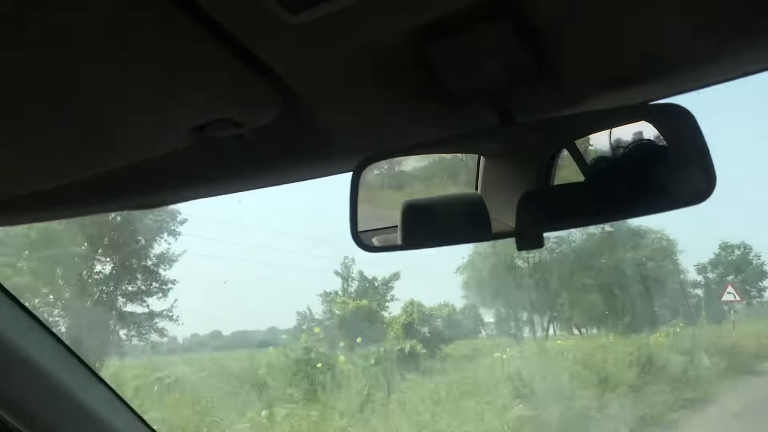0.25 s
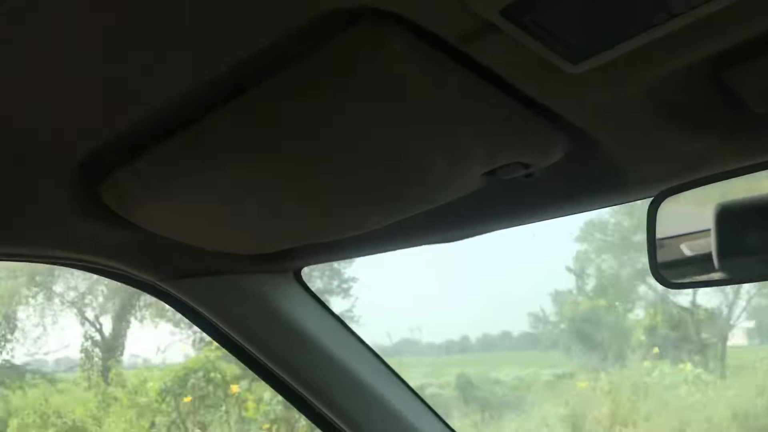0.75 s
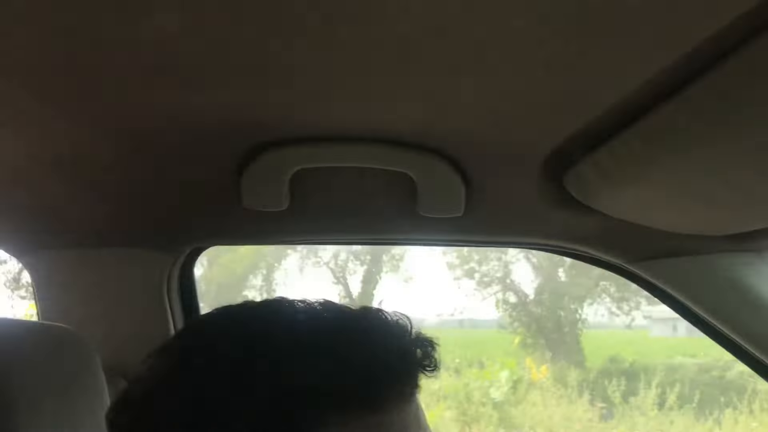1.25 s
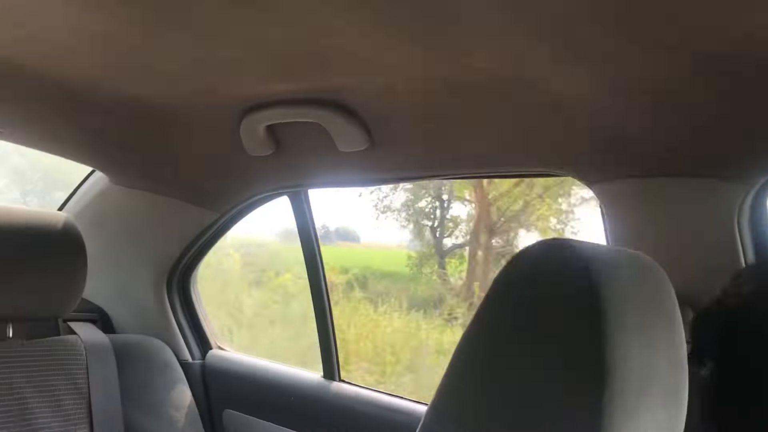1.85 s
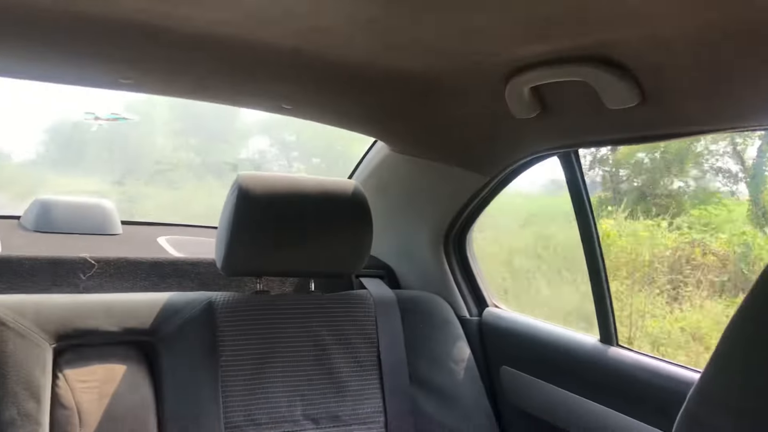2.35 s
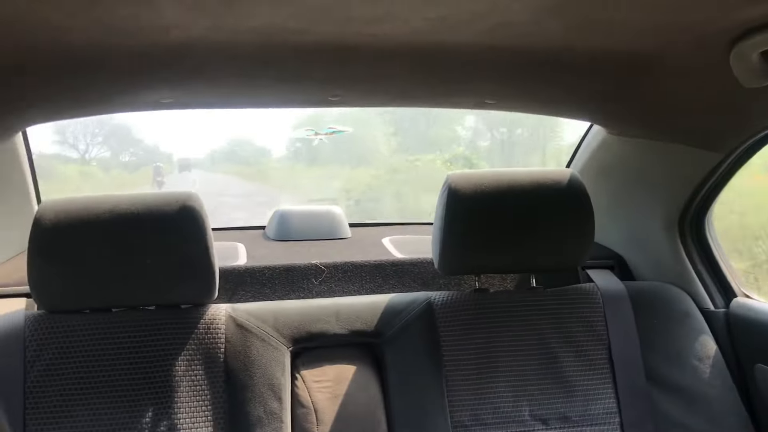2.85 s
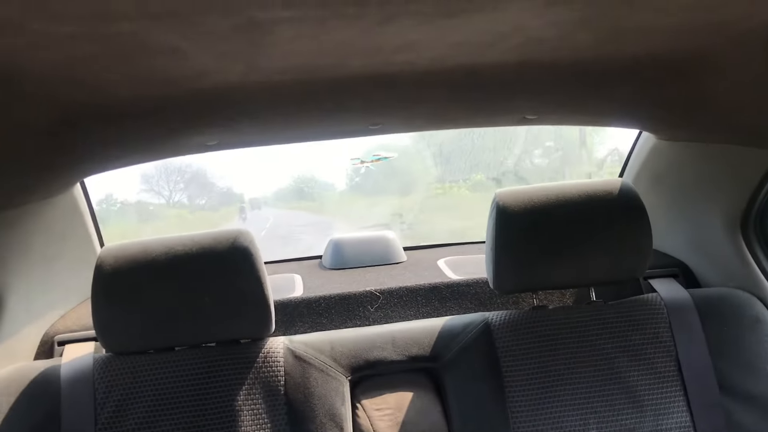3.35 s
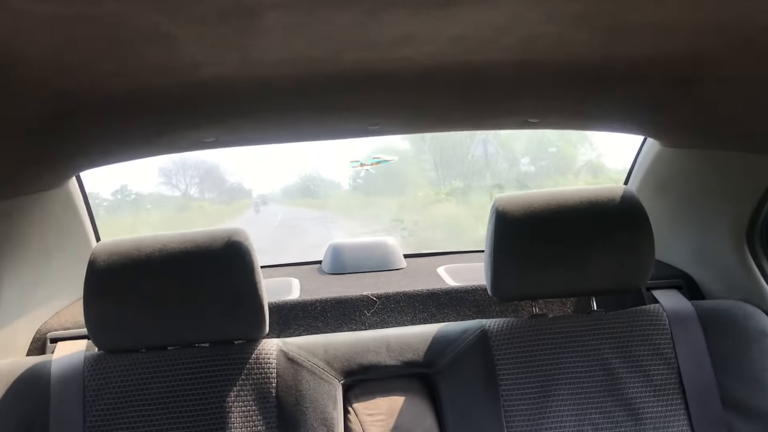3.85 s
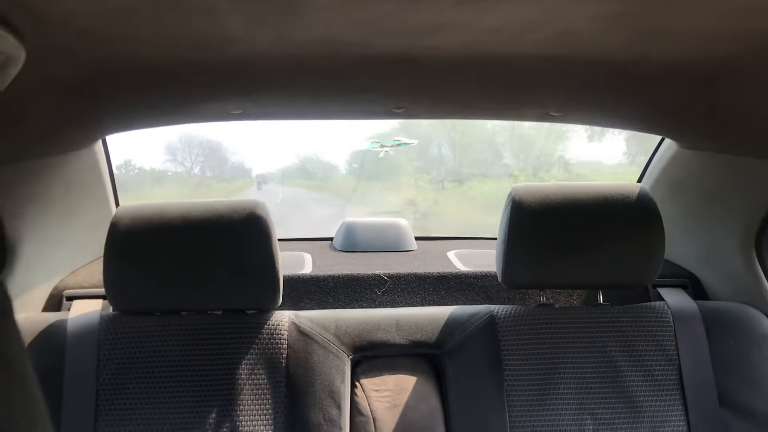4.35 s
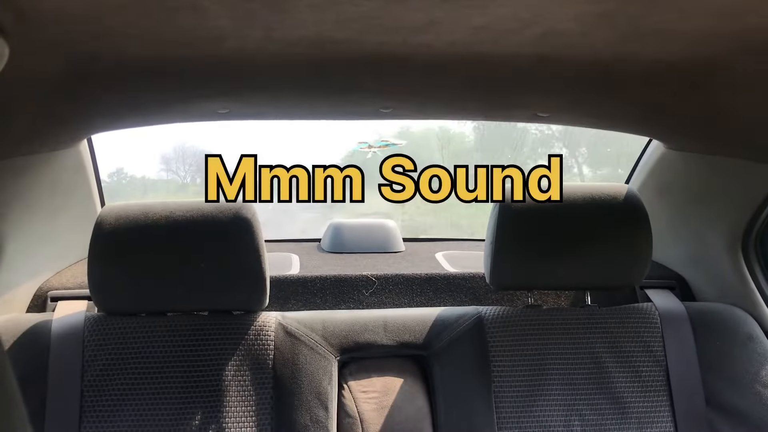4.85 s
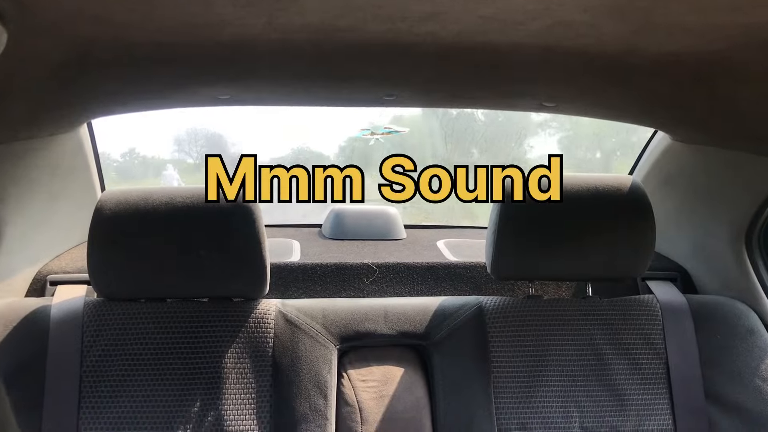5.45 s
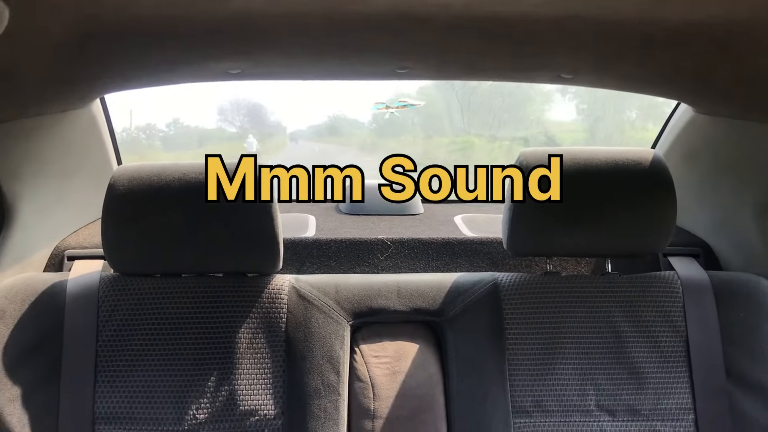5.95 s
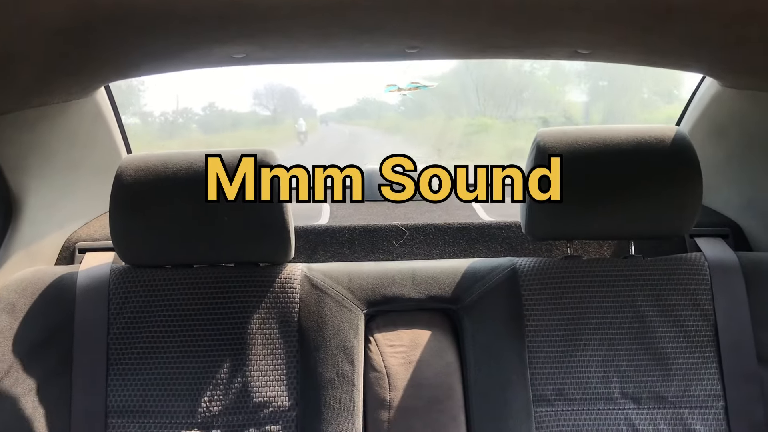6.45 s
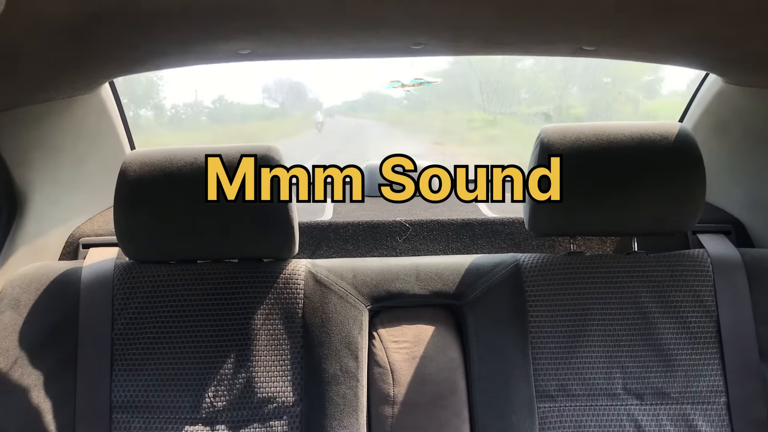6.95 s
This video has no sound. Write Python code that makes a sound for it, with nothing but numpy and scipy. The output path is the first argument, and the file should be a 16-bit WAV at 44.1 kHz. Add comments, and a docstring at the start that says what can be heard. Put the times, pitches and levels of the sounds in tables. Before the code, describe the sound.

A car cabin drones low with bearing hum, engine and bumpy tyre noise; plastic clicks and creaks, and a two-tone horn toots once.

```python
"""A worn wheel bearing hums inside a car rolling along a country road.
Under it the engine drones, and the tyres rumble, roar and knock over the bumps.
Sharp plastic clicks and creaks come as from a grip shifting on the camera, and a hand brushes it.
Plastic squeaks as it slips, and loose parts rattle faintly.
A little past halfway, a two-tone horn gives one short toot with a faint echo from the trees."""
import sys
import numpy as np
from scipy import signal
from scipy.fft import rfft, irfft
from scipy.io import wavfile
from scipy.ndimage import uniform_filter1d

SR = 44100
rng = np.random.default_rng(int(sys.argv[2]) if len(sys.argv) > 2 else 0)


def bounce(signal):
    """Save signal as a 16-bit WAV file at the path given by the first command-line argument."""
    frames = np.transpose(np.atleast_2d(signal))
    limited = np.clip(frames, -1, 1)
    pcm = np.round(limited * 32767).astype(np.int16)
    wavfile.write(sys.argv[1], SR, pcm)


N = 317079
TIME = np.arange(N) / SR
HZ = np.fft.rfftfreq(N, 1 / SR)

# The bright snap and the woody body of a plastic tick. Each row: frequency in Hz, relative level in dB.
TICK_SNAP = [(1500, -6.5), (3700, -1.5), (5100, -6), (6200, -1.5), (7800, -3), (9300, 0.5), (10500, -4),
             (11400, 1), (13200, -0.5), (14300, -13), (15700, -33)]
TICK_BODY = [(250, -7.5), (1100, 5), (1900, 2), (2600, -4.5), (3700, -3), (6500, -12.5), (12000, -31)]


def bearing(hz, hum_db=-21.5, octave_db=-8):
    """The pitted track inside the bearing hums, with a rougher tone an octave above."""
    cycles = np.cumsum(hz) / SR
    hum = tone(cycles, waver=0.19, rate=3.7)
    octave = tone(2 * cycles, waver=0.63, rate=14)
    return amp(hum_db) * cabin_gain(hz) * (hum + amp(octave_db) * octave)


def engine(speed):
    """The engine fires twice a turn, so its tones lie at even multiples of its turning speed."""
    # Each row: multiple of the engine speed, level in dB before the cabin shapes it.
    tones = [(2, -42.5), (4, -42.5), (6, -25.5), (8, -24.5), (10, -24), (12, -30), (14, -31.5), (16, -26.5),
             (22, -37.5)]
    turns = np.cumsum(speed) / SR
    return sum(amp(db) * cabin_gain(round(k) * speed) * tone(round(k) * turns, waver=0.18, rate=4.5)
               for k, db in tones)


def cabin_gain(hz):
    """Standing waves in the cabin lift or swallow a tone as its pitch moves."""
    # Each row: frequency in Hz, gain in dB.
    standing_waves = [(58, -9.5), (63, -12), (69, 1), (114, -8), (133, 0), (152, -8.5), (175, -8),
                      (179, 3.3), (182, 3), (187, -0.8), (196, 1.5), (205, -10.5), (213, -6), (224, -14),
                      (265, -13), (303, -7.5), (318, -9.5), (330, -22.5)]
    return amp(np.interp(hz, *np.transpose(standing_waves)))


def road(roughness, grit_db=1.0):
    """The road shakes the suspension, makes the cabin air boom, roars in the tyres and knocks the body."""
    # The tone colours of three road noises. Each row: frequency in Hz, relative level in dB.
    rumble_spectrum = [(10, -41.5), (19, -24), (33, -4.5), (44, 1.5), (56, 0), (74, -13), (90, -11),
                       (115, -37), (200, -80)]
    roar_spectrum = [(150, -24.5), (170, -3.5), (186, 15), (222, 6), (270, 6), (330, 0), (400, -1.5),
                     (540, -10.5), (700, -9), (1050, -14.5), (1500, -22.5), (2200, -32), (4000, -47.5),
                     (9000, -77.5)]
    knock_spectrum = [(110, -20), (220, 0.5), (310, 0.5), (420, 3), (600, -11), (1100, -26.5),
                      (2500, -51.5)]
    # Where the cabin air rings. Each row: frequency in Hz, width in Hz, relative level in dB.
    resonances = [(90.4, 14, -4.5), (121.6, 14, 1.5), (136.2, 24, -0.5)]
    # Rougher road is louder. Each pair: level in dB at roughness 0, dB added per dB of roughness.
    rumble_law = (-26.5, 1.65)
    boom_law = (-25, 1.52)
    roar_law = (-29, 1.03)
    # Seams and potholes. Each row: start in seconds, then knock, boom and rumble levels in dB.
    bumps = [(0.2, -47, -24, -38), (0.535, -30, -21, -23), (0.795, -21.5, -32, -28), (0.935, -28, -23, -24),
             (1.224, -26, -25, -27), (1.51, -31, -21, -22), (1.63, -32, -20, -25), (1.85, -31, -27, -23),
             (2.244, -33, -19, -26), (3.14, -32.5, -23, -23), (3.64, -39, -16.5, -32),
             (3.77, -36, -20, -24), (3.88, -40, -20, -20), (4.0, -36, -27, -18), (4.18, -32, -36, -36),
             (4.98, -49, -21, -38), (6.81, -44, -20.5, -42), (7.02, -42, -20, -38)]
    starts, knock_db, boom_db, rumble_db = np.transpose(bumps)
    rumble_gain, boom_gain, roar_gain = (amp(db + slope * roughness)
                                         for db, slope in (rumble_law, boom_law, roar_law))
    ring_power = sum(amp(db) ** 2 / (1 + ((HZ - hz) / width) ** 2) ** 3 for hz, width, db in resonances)
    boom = irfft(rfft(rng.standard_normal(N)) * np.sqrt(ring_power), N)
    roar = noise(roar_spectrum) * amp(grit_db * wander(25))
    rumble = noise(rumble_spectrum)
    return (np.hypot(rumble_gain, jolts(starts, rumble_db, rise_s=0.054)) * steadied(rumble)
            + np.hypot(boom_gain, jolts(starts, boom_db, rise_s=0.043)) * steadied(boom)
            + roar_gain * steadied(roar)
            + jolts(starts, knock_db, rise_s=0.011) * noise(knock_spectrum))


def jolts(starts, levels_db, rise_s):
    """Each bump's push swells for the rise time, then dies away."""
    ages = [np.maximum(TIME - start, 0) / rise_s for start in starts]
    return sum(amp(db) * age * np.exp(1 - age) for age, db in zip(ages, levels_db))


def horn(rise_s=0.016, brighten_s=0.014, sag=0.08, settle_s=0.0138, fade_s=0.11,
         jitter=0.002, rasp_db=-50, flutter_db=2.5, flutter_hz=9):
    """Two thin discs buzz into flared horns; each starts flat and dull, then settles."""
    # The low horn, then the high one. Each row: on and off times in seconds, pitch in Hz.
    horns = [(4.334, 4.52, 398.5), (4.322, 4.51, 502.5)]
    # Their tones. Each row: multiple of the pitch, level in dB. Skipped multiples lie in between.
    low_tones = [(1, -34.5), (2, -40), (3, -38), (4, -41), (5, -48), (6, -51), (7, -65), (8, -57),
                 (10, -70), (16, -83), (33, -84)]
    high_tones = [(1, -33), (2, -35.5), (3, -39.5), (4, -47.5), (5, -41), (6, -43.5), (7, -45.5), (8, -60),
                  (9, -58), (11, -71), (13, -61.5), (16, -77), (19, -72), (26, -71)]
    # The rasp of the contact that switches the current. Each row: frequency in Hz, relative level in dB.
    rasp_spectrum = [(700, -20), (1500, 2), (1800, -14), (2550, 0), (3500, -14), (5000, -24), (13000, -20),
                     (15000, -42)]
    out = np.zeros(N)
    at = slice(round((horns[1][0] - 0.1) * SR), round((horns[0][1] + 0.4) * SR))
    for (on, off, hz), tones in zip(horns, (low_tones, high_tones)):
        age = np.maximum(TIME[at] - on, 0)
        pitch = hz * (1 - sag * np.exp(-age / settle_s) + jitter * wander(120)[at])
        cycles = np.cumsum(pitch) / SR
        release = amp(-60 * np.maximum(TIME[at] - off, 0) / fade_s)
        multiples, levels = np.transpose(tones)
        for k in range(1, round(multiples[-1]) + 1):
            phase, shift, pace = rng.random(3)
            attack = 1 - np.exp(-(age / (rise_s + brighten_s * np.log(k))) ** 2)
            # reflections from the passing roadside make each tone flutter on its own
            flutter = flutter_db * np.sin(2 * np.pi * (flutter_hz * (0.5 + pace) * age + shift))
            wave = np.sqrt(2) * np.sin(2 * np.pi * (k * cycles + phase))
            out[at] += amp(np.interp(k, np.round(multiples), levels) + flutter) * attack * release * wave
        out[at] += amp(rasp_db) * np.minimum(age / rise_s, 1) * release * noise(rasp_spectrum)[at]
    return out


def clicks(rise_s=0.0027, hold_s=0.0018, fade_s=0.054, tick_db=-2.5, creak_db=-1, creak_snap_db=-9,
           grain_db=1.5, ripple_db=3):
    """Sharp plastic clicks and creaks, as from a grip shifting on the camera: a snap over a woody body."""
    # Each row: start in seconds, relative level in dB, body level in dB compared with the snap.
    ticks = [(0.2942, -48, -2), (0.407, -42.5, -7), (0.5347, -47, 2), (0.731, -38.5, 0), (0.8364, -46, -11),
             (1.0445, -37.5, -10), (1.2095, -43, -12), (1.4289, -42.5, -2), (1.6021, -31.5, 4.5),
             (1.7355, -41, 2), (1.7673, -39.5, -8), (1.8538, -31, 0), (2.4117, -45, -4), (2.5097, -46, -4),
             (2.86, -44, -4), (2.9418, -49, 5), (3.1597, -44.5, -2), (3.5021, -49, -4), (3.6039, -49, 3),
             (3.73, -37.5, 3), (3.7698, -46, -4), (3.9671, -37, -1), (3.9995, -28, 0), (4.0774, -40.5, -6),
             (4.142, -32.5, -1), (4.1623, -40.5, 5), (4.18, -39, 1), (4.2528, -37, -4), (6.8625, -52, 0),
             (7.138, -47, 0)]
    # Each row: loudest moment in seconds, relative level in dB, length in seconds.
    creaks = [(0.898, -35, 0.029), (1.083, -38.5, 0.029), (3.918, -38.5, .022), (4.008, -42, 0.022),
              (4.191, -33, 0.016)]
    grain = unit(amp(grain_db * wander(650)))
    # many narrow peaks and dips colour the sound
    ripple = amp(ripple_db * wander(30)[:len(HZ)])
    snap, body = (unit(irfft(rfft(noise(spectrum)) * ripple, N)) * grain
                  for spectrum in (TICK_SNAP, TICK_BODY))
    out = np.zeros(N)
    for start, db, body_db in ticks:
        at = slice(round(start * SR), round(start * SR) + SR // 8)
        age = TIME[at] - TIME[at][0]
        fall_db = 60 * np.maximum(age - hold_s, 0) / fade_s
        shape = np.minimum(age / rise_s, 1) * amp(db + tick_db - fall_db)
        out[at] += shape * (snap[at] + amp(body_db) * body[at])
    for middle, db, length in creaks:
        out += amp(db + creak_db) * swell(middle, length) * (body + amp(creak_snap_db) * snap)
    return out


def squeaks(scratch=0.061):
    """Plastic sticks and slips in brief, scratchy chirps."""
    # Each row: start and length in seconds, first and last pitch in Hz, level in dB.
    chirps = [(.676, 0.02, 4100, 3630, -52), (2.428, 0.036, 1720, 1830, -49.5),
              (2.491, 0.064, 4100, 3900, -58.5), (2.549, 0.03, 3730, 3080, -58)]
    out = np.zeros(N)
    for start, length, start_hz, end_hz, db in chirps:
        progress = np.clip((TIME - start) / length, 0, 1)
        pitch = start_hz + (end_hz - start_hz) * progress
        out += amp(db) * np.sin(np.pi * progress) * band(pitch, scratch * start_hz)
    return out


def swishes(flicker_db=2.3, ring_hz=4600, spread_hz=170):
    """A soft, broad swell of hiss at the start; later a hand brushes the camera, whose shell rings thinly."""
    # Each row: loudest moment and length in seconds, swish in dB, ring in dB compared with the swish.
    # The first row is the opening swell of hiss.
    swells = [(0.25, 0.7, -56.5, -24), (0.563, 0.18, -50.5, -22), (0.955, 0.49, -50, -25),
              (1.62, 0.46, -46, -18), (1.648, 0.14, -43, -9), (3.84, 0.25, -55.5, -28),
              (4.136, 0.25, -54.5, -28), (4.672, 0.2, -47, -14)]
    # Each row: frequency in Hz, relative level in dB.
    swish_spectrum = [(300, -12), (900, 5.5), (1850, -0.5), (2200, 4), (4200, -1.5), (4600, -5.5),
                      (5000, -6.5), (6200, -6), (7700, -11.5), (9200, -9.5), (10400, -11), (11400, -7),
                      (13000, -10.5), (15000, -28)]
    swish, ring = noise(swish_spectrum), band(ring_hz, spread_hz)
    out = np.zeros(N)
    for middle, length, db, ring_db in swells:
        texture = np.roll(swish + amp(ring_db) * ring, rng.integers(N))
        out += amp(db) * swell(middle, length) * texture
    return out * amp(flicker_db * wander(40))


def tread(whirr_hz=685, spread_hz=38):
    """The tread blocks make the tyre ring with a whirr, which comes up on the smoother road."""
    # Each row: time in seconds, level in dB.
    whirr_levels = [(0, -55), (5.4, -65), (5.7, -48.5), (7.19, -45.5)]
    return amp(curve(whirr_levels)) * band(whirr_hz, spread_hz)


def hiss(roughness, level_db=-58.2, slope=0.21, flicker_db=1.5):
    """Wind and tyres hiss, a little more on rough ground."""
    # Each row: frequency in Hz, relative level in dB.
    hiss_spectrum = [(600, -12), (1600, 0.5), (2700, -2), (3600, -5), (4400, -4.5), (4900, -9),
                     (5400, -5.5), (6300, -9), (7700, -17), (9600, -14.5), (10500, -16), (11100, -11.5),
                     (12800, -11.5), (14500, -26.5)]
    return amp(level_db + slope * roughness + flicker_db * wander(40)) * noise(hiss_spectrum)


def rattle(roughness, per_second=14, level_db=-70.5, slope=0.82, spread_db=3.5, fade_s=0.04, body_db=-4):
    """Loose parts tick faintly at random, harder on rough ground."""
    hits = rng.random(N) < per_second / SR
    strength = amp(spread_db * np.minimum(rng.exponential(1, N), 2))
    decay = amp(-60 * TIME[:SR // 8] / fade_s)
    shape = signal.fftconvolve(hits * strength, decay)[:N]
    plastic = noise(TICK_SNAP) + amp(body_db) * noise(TICK_BODY)
    return amp(level_db + slope * roughness) * unit(shape * plastic)


def buzz(bearing_hz, decay_cycles=0.22):
    """In two short spells, a loose part chatters once in each cycle of the bearing's hum."""
    # Each row: loudest moment in seconds, length in seconds, level in dB.
    spells = [(5.9, 0.18, -65), (6.21, 0.36, -63)]
    # Each row: frequency in Hz, relative level in dB.
    buzz_spectrum = [(3000, -30), (5200, 0), (6300, 0), (7500, -14), (11000, -9), (12700, -5), (14500, -25)]
    cycles = np.cumsum(bearing_hz) / SR
    pulses = np.exp(-(cycles % 1) / decay_cycles)
    loudness = sum(amp(db) * swell(middle, length) for middle, length, db in spells)
    return loudness * unit(pulses * noise(buzz_spectrum))


def roadside(x, delay_s=0.095, echo_db=-22):
    """Adds one faint echo thrown back by the trees."""
    return x + amp(echo_db) * np.interp(TIME - delay_s, TIME, x)


def amp(db):
    """Turns decibels into a gain to multiply by."""
    return 10 ** (np.asarray(db) / 20)


def unit(x):
    """Scales a signal to an average power of 1."""
    return x / np.sqrt(np.mean(x ** 2) + 1e-20)


def curve(rows):
    """Joins (time, value) points with straight lines."""
    return np.interp(TIME, *np.transpose(rows))


def swell(middle, length):
    """A smooth, bell-shaped rise and fall."""
    return np.exp(-(2 * (TIME - middle) / length) ** 2)


def noise(spectrum):
    """Noise whose tone colour follows the given (Hz, dB) points."""
    hz, db = np.transpose(spectrum)
    gain = amp(np.interp(np.log(HZ + 1), np.log(hz), db))
    return unit(irfft(rfft(rng.standard_normal(N)) * gain, N))


def wander(rate):
    """Smooth random motion, up to about rate changes a second."""
    return unit(irfft(rfft(rng.standard_normal(N)) * np.exp(-(HZ / rate) ** 2) * (HZ > 0), N))


def tone(cycles, waver, rate, drift=0.1):
    """A pure tone whose loudness wavers and whose phase drifts a little."""
    loudness = np.sqrt(2) * (1 + waver * wander(rate))
    return loudness * np.sin(2 * np.pi * (cycles + rng.random()) + drift * wander(rate))


def band(hz, spread_hz):
    """A narrow noise around a steady or moving pitch."""
    phase = 2 * np.pi * np.cumsum(hz * np.ones(N)) / SR
    return unit(wander(spread_hz) * np.cos(phase) + wander(spread_hz) * np.sin(phase))


def steadied(x, size=8000):
    """Keeps the fast flutter of a noise and evens out its slow swells."""
    return x / np.sqrt(uniform_filter1d(uniform_filter1d(x ** 2, size), size // 2) + 1e-9)


def scene():
    """Everything heard inside the cabin as the car slows, then picks up a little."""
    # Each row: time in seconds, engine speed in turns per second.
    engine_speeds = [(0.0, 22.75), (0.5, 22.66), (1.0, 22.54), (1.5, 22.14), (2.4, 21.7), (3.0, 21.37),
                     (3.5, 20.95), (4.25, 20.17), (4.7, 19.62), (5.4, 18.85), (5.9, 18.53), (6.5, 18.94),
                     (7.19, 20.05)]
    # Each row: time in seconds, roughness of the road in dB.
    road_surface = [(0, -2.7), (0.33, 0.5), (0.55, 2.8), (0.98, 4.1), (1.37, 0.5), (1.65, 3), (2.2, 0),
                    (3.5, -0.6), (3.9, 1.5), (4.4, -2.3), (5.15, -4.2), (5.9, -2.3), (7.19, -2.3)]
    speed, roughness = curve(engine_speeds), curve(road_surface)
    bearing_hz = 3.085 * speed  # the wheel is geared to the engine
    driving = engine(speed) + bearing(bearing_hz) + tread() + road(roughness) + hiss(roughness)
    small_sounds = clicks() + squeaks() + rattle(roughness) + swishes() + buzz(bearing_hz)
    return (driving + small_sounds + roadside(horn()))[None]


def record(dry):
    """Cuts off the highest treble, above 15750 Hz."""
    low_pass = signal.firwin(511, 15750, window=("kaiser", 9), fs=SR)
    return signal.oaconvolve(dry, low_pass[None], "same")


dry = scene()
out = record(dry)
bounce(out)
```